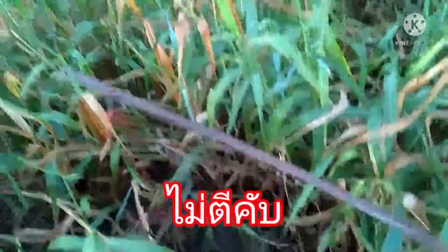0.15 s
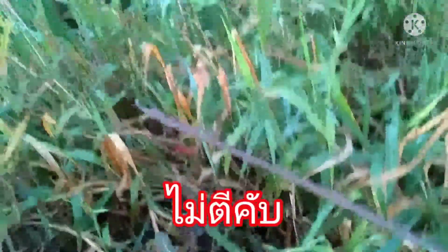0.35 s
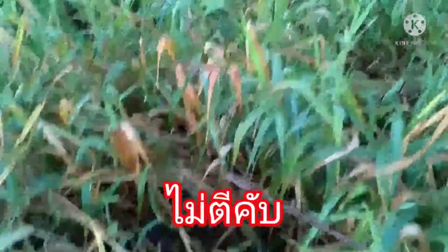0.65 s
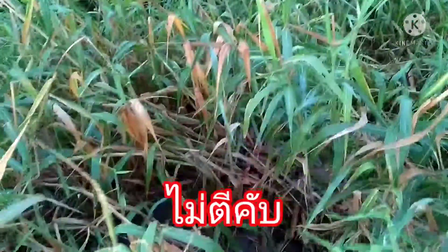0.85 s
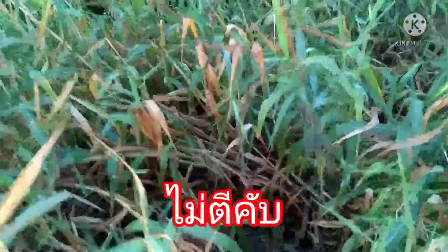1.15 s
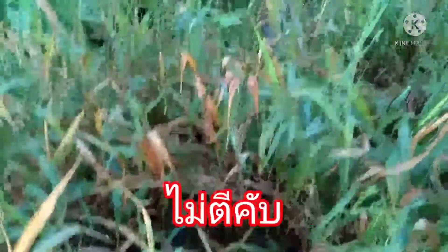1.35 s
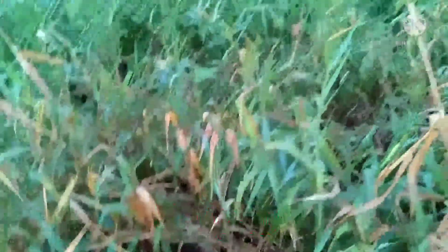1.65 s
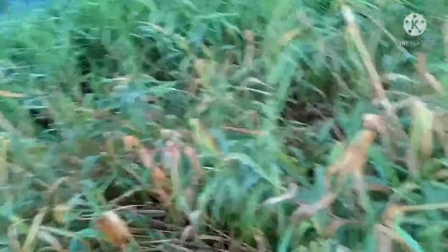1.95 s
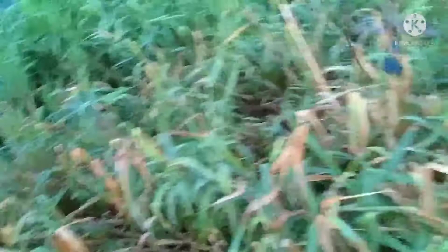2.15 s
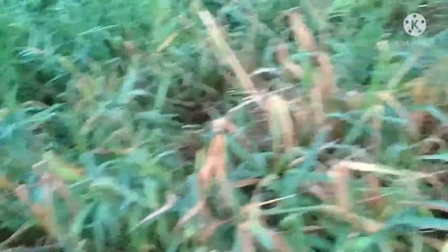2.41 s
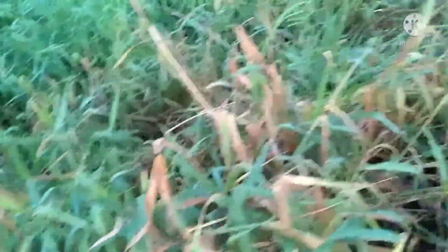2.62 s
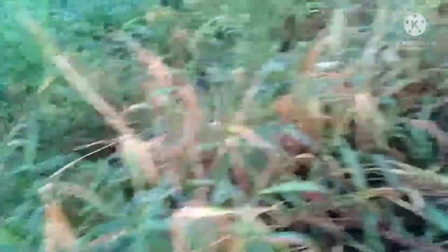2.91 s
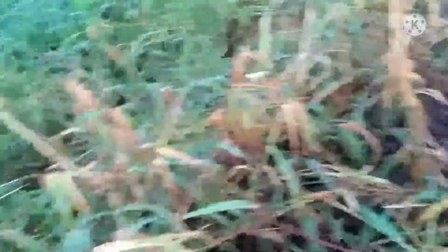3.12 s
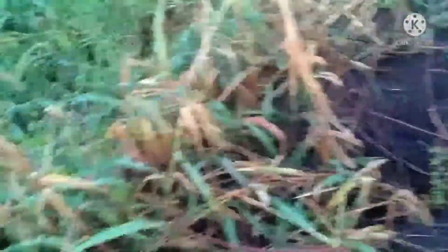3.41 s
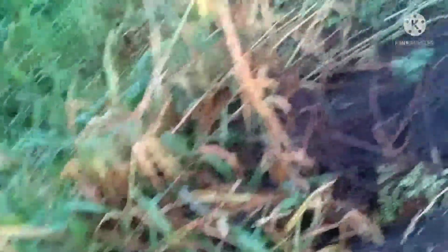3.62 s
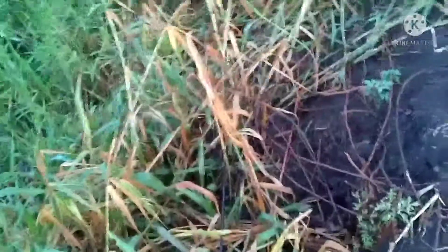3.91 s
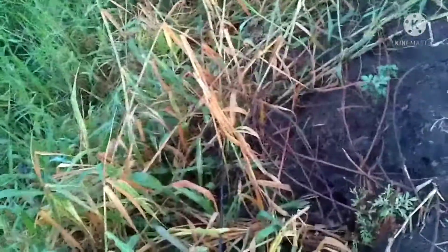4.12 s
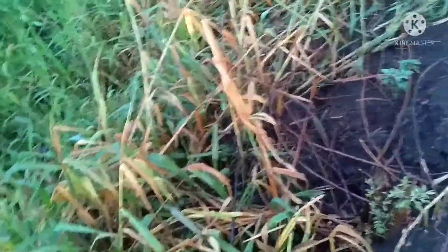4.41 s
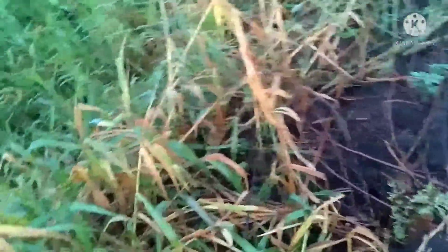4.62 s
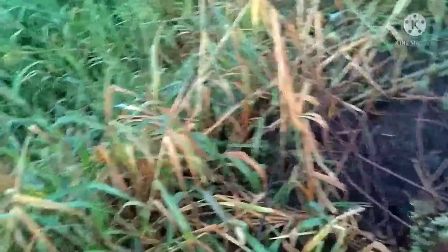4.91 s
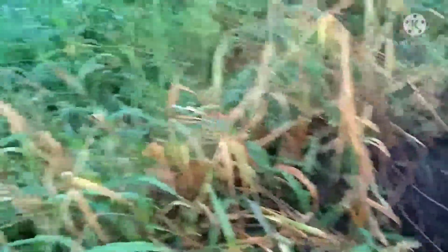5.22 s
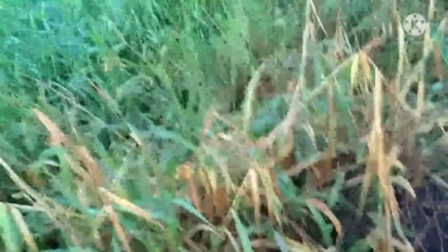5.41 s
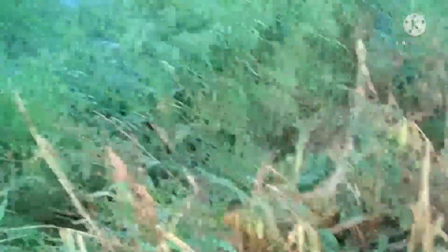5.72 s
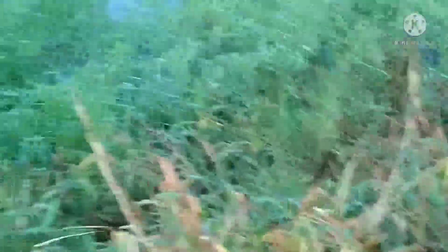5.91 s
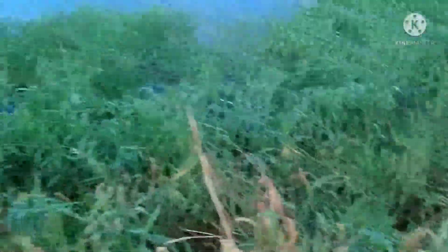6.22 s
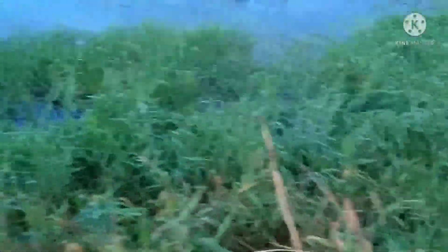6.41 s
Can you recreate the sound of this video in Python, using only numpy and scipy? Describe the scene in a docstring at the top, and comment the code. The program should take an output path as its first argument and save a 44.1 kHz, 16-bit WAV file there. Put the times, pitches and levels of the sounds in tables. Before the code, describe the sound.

A handheld microphone moves slowly through a field edge. Grass hisses strongest at the start, while small birds chirp in quick overlapping bouts behind, with a few clear whistles nearer. Faint bumps and scrapes lead to an abrupt bright clack on the casing, then lighter thuds with very high squeaks. Afterwards come sparse ticks, harsh little bird calls and a low handling swell.

```python
"""Someone moves slowly through tall grass at the edge of a field, a microphone in the hand.
From the start, shaped noise rumbles and hisses as open air and grass; gliding tones twitter as birds.
Soft knocks lead to one hard clatter halfway, made by short pushes that set the casing ringing.
Scuffs of tiny slips and thin squeaking tones come with it and again a second later, with softer knocks.
Near the end the grip shifts in a dull swell of low noise, while the birds go on."""
import sys
import numpy as np
from scipy import signal
from scipy.fft import rfft, irfft
from scipy.io import wavfile
from scipy.ndimage import uniform_filter1d

SR = 44100
rng = np.random.default_rng(int(sys.argv[2]) if len(sys.argv) > 2 else 0)


def transcribe(signal):
    """Save signal, clipped to [-1, 1], as a 16-bit WAV file at the path in sys.argv[1]."""
    frames = np.atleast_2d(signal).T
    limited = np.clip(frames, -1, 1)
    pcm = np.round(limited * 32767).astype(np.int16)
    wavfile.write(sys.argv[1], SR, pcm)


N = 288855
TIME = np.arange(N) / SR  # seconds

# tone balance of the flock: pitch_hz [Hz], level_db [dB per Hz, relative]
FLOCK_SPECTRUM = [(1200, -21.5), (1800, -5.5), (2300, 3), (3000, -1), (3700, 1.5), (4400, -18), (5500, -11),
                  (7000, -41.5)]
# bouts in which the flock gets excited: start_s [s], length_s [s], strength_db [dB], peak_pitch_hz [Hz]
EXCITED_BOUTS = [(0.115, 0.47, -51.5, 3017), (0.523, 0.31, -50, 3320), (0.821, 0.68, -61, 2978),
                 (1.547, 0.6, -55, 3050), (2.48, 0.67, -55, 3153), (3.334, 0.28, -59, 3170),
                 (3.702, 0.25, -54.5, 2840), (4.171, 0.26, -57.5, 2700), (4.721, 0.63, -54.5, 3162),
                 (5.308, 0.4, -53.5, 3405), (5.72, 0.87, -58, 3380)]
# tone balance of a snapping stem: pitch_hz [Hz], level_db [dB per Hz, relative]
SNAP_SPECTRUM = [(400, -16), (1500, 0.5), (3000, -1), (5000, -6), (7000, -2.5), (8600, 9), (10500, -5),
                 (12500, -6), (15200, -4)]


def from_db(db):
    """Turn decibels into a gain."""
    return 10 ** (np.asarray(db) / 20)


def rms_one(x):
    """Scale a signal to an average power of 1."""
    return x / np.sqrt(np.mean(x ** 2) + 1e-20)


def drift(rate):
    """A random curve of average power 1 that takes a new direction rate times a second."""
    knots = rng.standard_normal(4000)
    return rms_one(np.interp(TIME * rate, np.arange(4000), knots))


def colour(x, spectrum):
    """Give a signal the tone balance of a table, falling away past its ends, at average power 1."""
    table_hz, table_db = np.transpose(spectrum)
    hz = np.maximum(np.fft.rfftfreq(N, 1 / SR), 1)
    gain = from_db(np.interp(np.log(hz), np.log(table_hz), table_db))
    low_fade = np.minimum(hz / table_hz[0], 1) ** 2
    high_fade = np.minimum(table_hz[-1] / hz, 1) ** 2
    return rms_one(irfft(rfft(x) * gain * low_fade * high_fade, N))


def add(out, start_s, sound):
    """Mix a sound in at a given time."""
    at = max(round(start_s * SR), 0)
    out[at:at + len(sound)] += sound[:max(N - at, 0)]


def swells(rows, rest_db, rise_db_per_s, fall_db_per_s):
    """A gain that rises to each row's level, holds for its length and sinks back to rest."""
    power = from_db(rest_db) ** 2
    for start_s, length_s, level_db in rows:
        before_s = np.maximum(start_s - TIME, 0)
        after_s = np.maximum(TIME - start_s - length_s, 0)
        away_db = rise_db_per_s * before_s + fall_db_per_s * after_s
        power = power + from_db(level_db - away_db) ** 2
    return np.sqrt(power)


def friction(per_s, spread_db):
    """Rubbing is a stream of tiny slips of uneven size, at random moments; average power 1."""
    uneven_db = spread_db * np.minimum(rng.exponential(1, N), 4)
    sizes = from_db(uneven_db) * rng.standard_normal(N)
    slipping = rng.random(N) < per_s / SR
    return rms_one(sizes * slipping)


def whistle(length_s, start_hz, end_hz, arch_hz, waver, waver_rate, edge, partials_db=(0,)):
    """One gliding tone with unsteady pitch and loudness, soft ends and optional overtones."""
    u = np.linspace(0, 1, max(int(length_s * SR), 16))  # 0 at the start, 1 at the end
    random_rows = rng.standard_normal((2, 200))
    wobble, swell = (np.interp(u * length_s * waver_rate, np.arange(200), row) for row in random_rows)
    glide_hz = start_hz + (end_hz - start_hz) * u
    bow_hz = arch_hz * (1 - (2 * u - 1) ** 2)
    hz = (glide_hz + bow_hz) * (1 + waver * wobble)
    phase = 2 * np.pi * np.cumsum(hz) / SR
    tone = sum(from_db(db) * np.sin(k * phase) for k, db in enumerate(partials_db, 1))
    return np.sqrt(2) * tone * signal.windows.tukey(len(u), edge) * from_db(2 * swell)


def thicket(x, wet_db, t60):
    """Stems and bushes scatter sound into a short diffuse tail; t60 is its 60 dB decay in seconds."""
    t = TIME[:SR // 2]
    tail = rng.standard_normal(len(t)) * from_db(-60 * t / t60) * (t > .008)
    tail = tail / np.linalg.norm(tail)
    return x + from_db(wet_db) * signal.fftconvolve(x, tail)[:N]


def open_air(rumble_db=-56.0, field_db=-60.5, drone_hz=1060, drone_width_hz=130):
    """Shaped noise makes a low rumble and the field's even murmur; a narrow noise band drones far away."""
    # tone balance of the low rumble: pitch_hz [Hz], level_db [dB per Hz, relative]
    rumble_spectrum = [(18, -70.5), (30, -44.5), (48, -22.5), (61, -16.5), (78, -4.5), (128, 3), (259, -10),
                       (321, -13), (417, -29), (491, -14), (600, -33), (780, -46.5), (1320, -120)]
    # tone balance of the murmur: pitch_hz [Hz], level_db [dB per Hz, relative]
    field_spectrum = [(300, 9.5), (480, 3.5), (620, -1.5), (800, -1.5), (1050, 0), (1300, -3.5), (1700, -1),
                      (2300, 1), (3400, -1.5), (4500, -5), (6000, -20.5), (8500, -18), (11000, -24.5),
                      (15500, -18)]
    # swells of the far drone: start_s [s], length_s [s], level_db [dB]
    drone_rows = [(.45, 0.43, -71), (3.9, 0.86, -71)]
    rumble = colour(rng.standard_normal(N), rumble_spectrum) * from_db(rumble_db)
    murmur = colour(rng.standard_normal(N), field_spectrum) * from_db(field_db)
    edges_hz = [drone_hz - drone_width_hz / 2, drone_hz + drone_width_hz / 2]
    band = signal.butter(2, edges_hz, "band", fs=SR, output="sos")
    drone = rms_one(signal.sosfilt(band, rng.standard_normal(N)))
    return rumble + murmur + drone * swells(drone_rows, rest_db=-75, rise_db_per_s=150, fall_db_per_s=60)


def chirps(count, common_hz, spread, typical_s, slur, uneven_db, overtone_db):
    """Short slurred chirps at random moments, scattered round a common pitch, evened out in level."""
    out = np.zeros(N)
    moments = rng.integers(0, N, count)
    variations = np.clip(rng.standard_normal((count, 5)), -2, 2)
    for at, (pitch, span, glide, arch, loud) in zip(moments, variations):
        hz = common_hz[at] * np.exp(spread * pitch)
        start_hz, end_hz = hz * np.exp(slur * glide), hz * np.exp(-slur * glide)
        chirp = whistle(typical_s * np.exp(0.36 * span), start_hz, end_hz, 0.0599 * hz * arch,
                        waver=0.027, waver_rate=258, edge=1.0, partials_db=(0, overtone_db))
        voice_db = np.interp(hz, *np.transpose(FLOCK_SPECTRUM))  # strongest between 2 and 4 kHz
        add(out, at / SR, chirp * from_db(uneven_db * loud + voice_db))
    out = thicket(out, wet_db=-7.5, t60=.4)
    nearby_power = uniform_filter1d(out ** 2, size=3000)
    return out / np.sqrt(nearby_power + 1e-6)


def flock(lead_db=-3, lead_pitch=1.06, others_db=-5, blend_db=-11):
    """Quick chirps, slower calls and a noise blend of the farthest birds swell in bouts; most pitches rise."""
    calm_db, calm_hz = -61.5, 2696  # the twitter between bouts
    bout_shape = 1.1  # power of the half sine that a bout follows
    power, common_hz = np.full(N, from_db(calm_db) ** 2), np.full(N, float(calm_hz))
    for start_s, length_s, strength_db, peak_pitch_hz in EXCITED_BOUTS:
        progress = np.clip((TIME - start_s) / length_s, 0, 1)
        excitement = np.abs(np.sin(np.pi * progress)) ** bout_shape
        power = power + (from_db(strength_db) * excitement) ** 2
        common_hz = common_hz + (peak_pitch_hz - calm_hz) * excitement
    lead = chirps(count=1700, common_hz=lead_pitch * common_hz, spread=0.103, typical_s=0.01275,
                  slur=.07, uneven_db=6.5, overtone_db=-25.5)
    others = chirps(count=800, common_hz=common_hz, spread=.3, typical_s=0.029,
                    slur=0.1116, uneven_db=4, overtone_db=-17.5)
    blend = colour(rng.standard_normal(N), FLOCK_SPECTRUM)
    return np.sqrt(power) * (from_db(lead_db) * lead + from_db(others_db) * others + from_db(blend_db) * blend)


def peeps(count):
    """Faint, thin arched notes at random moments of each bout, varied in pitch, length and strength."""
    typical_hz, pitch_spread, typical_s, typical_db = 4050, 0.079, 0.0333, -63.5
    arch, slide_spread = 0.078, 0.051  # shares of the pitch
    out = np.zeros(N)
    for start_s, length_s, _, _ in EXCITED_BOUTS:
        moments = rng.random(count)
        variations = np.clip(rng.standard_normal((count, 4)), -2, 2)
        for when, (pitch, span, slide, loud) in zip(moments, variations):
            hz = typical_hz * np.exp(pitch_spread * pitch)
            end_hz = hz * (1 + slide_spread * slide)
            peep = whistle(typical_s * np.exp(0.21 * span), hz, end_hz, arch * hz,
                           waver=0.012, waver_rate=610, edge=0.49)
            add(out, start_s + when * length_s, from_db(typical_db + 2 * loud) * peep)
    return out


def near_birds(note_partials_db=(0, -28), squawk_partials_db=(-9, -2, -4, -13, -18, -22)):
    """Gliding tones whistle clear or raspy, peep high, or squawk with many overtones, in a scattered tail."""
    # nearer notes: start_s [s], length_s [s], start_hz [Hz], end_hz [Hz], level_db [dB],
    # rasp [pitch waver as a share of pitch]
    note_rows = [(0.088, .14, 7000, 4700, -60.5, .067), (0.219, 0.047, 2620, 2760, -42, 0.0092),
                 (0.231, .1, 4420, 4270, -51.5, 0.011), (0.274, 0.014, 2450, 2280, -41.5, .015),
                 (0.301, 0.016, 2350, 2240, -44, 0.013), (0.325, 0.022, 2260, 2280, -38, .01),
                 (.333, 0.028, 3140, 3600, -52, .022), (0.507, .068, 2030, 1970, -48.5, 0.043),
                 (0.6, .04, 3090, 2910, -46.5, .06), (0.92, 0.03, 3200, 3340, -55, .015),
                 (0.947, .068, 2580, 2547, -47.5, 0.017), (1.098, 0.13, 5370, 4800, -63.5, .047),
                 (1.247, 0.084, 4500, 4530, -59.5, .006), (2.756, 0.084, 3740, 3550, -53, 0.0056),
                 (3.12, .018, 2100, 1960, -53, 0.034), (3.816, 0.067, 3600, 3300, -57, .008),
                 (4.743, .028, 3400, 5640, -61.5, .02), (5.97, 0.057, 4430, 3630, -60.5, 0.028),
                 (6.118, 0.15, 3570, 3360, -56, 0.024)]
    # harsh calls within the flock: start_s [s], length_s [s], start_hz [Hz], end_hz [Hz],
    # arch_hz [Hz, bend in the middle], strength_db [dB]
    squawk_rows = [(5.424, 0.039, 1750, 1730, -680, -54), (5.563, 0.035, 1590, 1040, 7, -60),
                   (6.299, 0.042, 1350, 1060, -150, -58), (6.349, 0.047, 1425, 1133, -200, -54.5)]
    note_arch = 0.0164  # every note bows upwards in the middle by this share of its starting pitch
    out = peeps(count=2)
    for start_s, length_s, start_hz, end_hz, level_db, rasp in note_rows:
        note = whistle(length_s, start_hz, end_hz, note_arch * start_hz,
                       waver=rasp, waver_rate=600, edge=.45, partials_db=note_partials_db)
        add(out, start_s, from_db(level_db) * note)
    for start_s, length_s, start_hz, end_hz, arch_hz, strength_db in squawk_rows:
        call = whistle(length_s, start_hz, end_hz, arch_hz,
                       waver=.025, waver_rate=400, edge=.5, partials_db=squawk_partials_db)
        add(out, start_s, from_db(strength_db) * call)
    return thicket(out, wet_db=-17.5, t60=0.23)


def brushing(flutter_db=2.5):
    """Sliding blades make a fluttering hiss of tiny slips; sparser slips of dry edges crackle in it."""
    # tone balance of the blades, favoured by the casing near 8.5 and 15 kHz:
    # pitch_hz [Hz], level_db [dB per Hz, relative]
    leaf_spectrum = [(300, -2.5), (1000, -4.5), (3000, 3.5), (5000, -10), (7400, -3.5), (8500, 3.5),
                     (9600, -4), (11500, -8), (13500, -7), (15200, 0)]
    # clumps of blades sliding past: start_s [s], length_s [s], level_db [dB]
    sweep_rows = [(0, 0.54, -52), (0.667, 0.041, -51), (1.25, 0.16, -57.5), (1.798, 0.34, -59),
                  (2.63, 0.061, -58), (3.548, 0.21, -62.5), (3.982, 0.083, -64.5), (4.536, .5, -65.5),
                  (5.959, 0.083, -61.5), (6.28, 0.42, -65.5)]
    hiss = colour(friction(per_s=30000, spread_db=3.5), leaf_spectrum) * from_db(flutter_db * drift(130))
    crackle = colour(friction(per_s=500, spread_db=2.5), SNAP_SPECTRUM) * from_db(-12)
    # the resting level is the hiss between sweeps
    return (hiss + crackle) * swells(sweep_rows, rest_db=-73, rise_db_per_s=130, fall_db_per_s=51)


def handling():
    """A grip shifting on the casing swells and fades as dull, low noise."""
    # tone balance of the hand: pitch_hz [Hz], level_db [dB per Hz, relative]
    hand_spectrum = [(45, -18), (90, 15.5), (200, 1), (330, 5.5), (480, -2.5), (900, -20), (1500, -9)]
    # shifts of the hand: start_s [s], length_s [s], level_db [dB at the peak of the swell]
    shift_rows = [(0.16, .22, -53.5), (0.434, 0.19, -52.5), (1.76, 0.21, -55.5), (2.656, 0.31, -54),
                  (4.55, 0.17, -55), (6.222, 0.55, -50)]
    envelope = np.zeros(N)
    for start_s, length_s, level_db in shift_rows:
        add(envelope, start_s, from_db(level_db) * np.hanning(max(int(length_s * SR), 8)))
    return envelope * colour(rng.standard_normal(N), hand_spectrum)


def ticks(t60=.017, level_db=-5):
    """A stem flicks the casing: a bright snap of noise that dies at once."""
    # stems ticking against the casing: start_s [s], strength_db [dB, before the common level]
    tick_rows = [(.47, -33), (1.345, -32), (2.119, -39), (3.629, -28.5), (3.664, -33.5), (3.995, -41.5),
                 (4.2942, -39), (4.8925, -45), (5.0086, -31.5), (6.1171, -42), (6.5274, -36.5)]
    envelope = np.zeros(N)
    for start_s, strength_db in tick_rows:
        add(envelope, start_s, from_db(strength_db + level_db - 60 * TIME[:2000] / t60))
    return envelope * colour(rng.standard_normal(N), SNAP_SPECTRUM)


def scuffs(fade_db=-7, catch_db=3.0, release_s=0.0042):
    """Contact on the casing bites at once, then rubs more lightly, catching and letting go."""
    # tone balance of the rubbing: pitch_hz [Hz], level_db [dB per Hz, relative]
    scuff_spectrum = [(150, 13), (500, -7.5), (1500, -8.5), (3000, -3), (5000, -7), (7000, -2.5), (8600, 5),
                      (10500, -6.5), (12200, -5), (14000, 1.5), (15200, -3.5)]
    # scuffs on the casing: start_s [s], length_s [s], level_db [dB at the first bite]
    scuff_rows = [(1.287, .12, -46.5), (1.468, .05, -53.5), (2.138, 0.025, -51), (2.16, 0.031, -46),
                  (2.18, 0.013, -41), (3.53, 0.084, -34.5), (3.603, 0.046, -46), (3.669, 0.048, -50),
                  (4.294, .035, -58.5), (4.562, 0.057, -42), (4.632, 0.047, -44)]
    pressure = np.zeros(N)
    for start_s, length_s, level_db in scuff_rows:
        u = np.linspace(0, 1, max(int(length_s * SR), 2))
        add(pressure, start_s, from_db(level_db + fade_db * u ** 4))
    # the smoothed copy lets each contact die away instead of stopping dead
    r = np.exp(-1 / (release_s * SR))
    smoothed = signal.lfilter([1 - r], [1, -r], pressure + 1e-12)
    pressure = np.maximum(pressure, smoothed)
    catching = from_db(catch_db * drift(470))
    return pressure * catching * colour(friction(per_s=24000, spread_db=2.5), scuff_spectrum)


def squeaks():
    """Where the grip sticks and slips evenly, the rubbing turns into a thin whistle."""
    # squeaks of the grip: start_s [s], length_s [s], pitch_hz [Hz], level_db [dB]
    squeak_rows = [(3.6, 0.039, 14600, -41), (3.705, 0.022, 8540, -56), (4.57, 0.044, 8460, -36),
                   (4.59, .017, 10000, -44), (4.629, 0.05, 14825, -33), (4.627, 0.048, 11360, -51),
                   (4.655, .015, 10110, -40), (4.692, .033, 8474, -60)]
    out = np.zeros(N)
    for start_s, length_s, pitch_hz, level_db in squeak_rows:
        squeak = whistle(length_s, pitch_hz, pitch_hz, 0, waver=.002, waver_rate=400, edge=.25)
        add(out, start_s, from_db(level_db) * squeak)
    return out


def knocks(contact_db=-2.0, grit_db=-17, grit_t60=0.039, top_hz=7800):
    """A blow is a short push, rounder when soft, that grates a little and sets the casing ringing."""
    # knocks on the casing: start_s [s], strength_db [dB], hardness_hz [Hz, higher is sharper]
    knock_rows = [(1.856, -28, 700), (1.874, -33, 900), (2.709, -23, 900), (2.713, -22, 1090),
                  (3.534, -18, 1970), (3.5457, -18.5, 4000), (3.5518, -5.5, 902), (3.5557, -7.5, 2870),
                  (3.5571, 4, 1580), (3.56, -15, 3000), (3.5818, -15, 6200), (3.5859, -8, 2680),
                  (4.563, -19.5, 347), (4.567, -23.5, 297), (4.57, -21, 300), (4.616, -30, 600),
                  (4.659, -28, 450)]
    # what the casing rings with: pitch_hz [Hz], level_db [dB, relative], t60_s [s to fall by 60 dB]
    casing_modes = [(135, -28, 0.074), (228, -22, 0.033), (296.3, -16.5, 0.03), (504, -24, 0.025),
                    (700, -13.5, 0.0083), (953, -14, 0.012), (1490, -8.5, 0.0036), (1754, -9, 0.0041),
                    (2830, -5.5, 0.0019), (5980, -7.5, 0.002)]
    force, t = np.zeros(N), TIME[:800]
    for start_s, strength_db, hardness_hz in knock_rows:
        push = t * np.exp(-2 * np.pi * hardness_hz * t)
        push = push / push.sum()
        # the surfaces grind as they part
        slips = np.diff(rng.standard_normal(len(t) + 1)) * from_db(grit_db - 60 * t / grit_t60)
        grinding = np.convolve(slips, push)[:len(t)]
        add(force, start_s, from_db(strength_db) * (push + grinding))
    out = from_db(contact_db) * force
    for pitch_hz, level_db, t60_s in casing_modes:
        r, w = from_db(-60 / (t60_s * SR)), 2 * np.pi * pitch_hz / SR  # decay and turn per sample
        ringing = signal.lfilter([.5, 0, -.5], [1, -2 * r * np.cos(w), r * r], force + 1e-18)
        out = out + from_db(level_db) * ringing
    band = signal.butter(4, [95, top_hz], "band", fs=SR, output="sos")
    return 2 * signal.sosfilt(band, out)


def scene():
    """Field and birds behind, grass and handling right at the microphone."""
    far = open_air() + flock() + near_birds()
    close = brushing() + handling() + ticks() + scuffs() + squeaks() + knocks()
    return (far + close)[None]


def record(dry):
    """Overload flattens any peak past the limit; a steep filter then cuts the top above 15.5 kHz."""
    limited = np.clip(dry, -.97, .97)
    top_cut = signal.ellip(10, .1, 80, 15500, fs=SR, output="sos")
    return signal.sosfilt(top_cut, limited)


dry = scene()
out = record(dry)
transcribe(out)
```